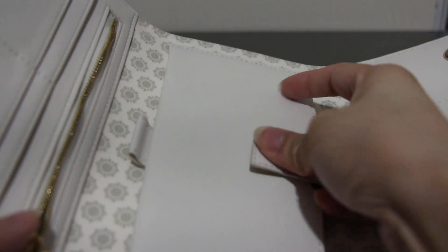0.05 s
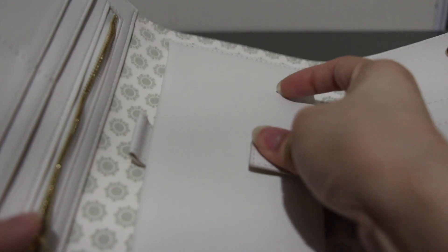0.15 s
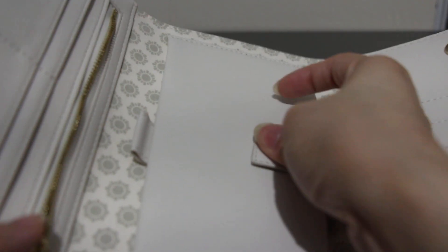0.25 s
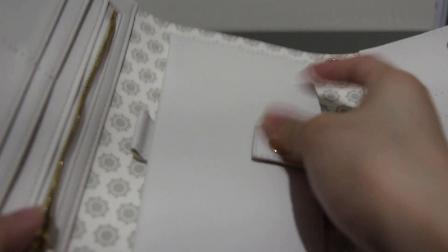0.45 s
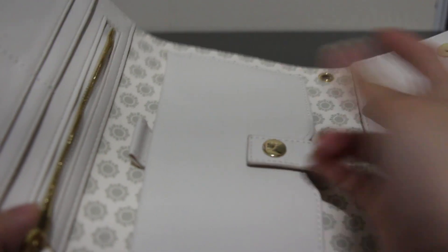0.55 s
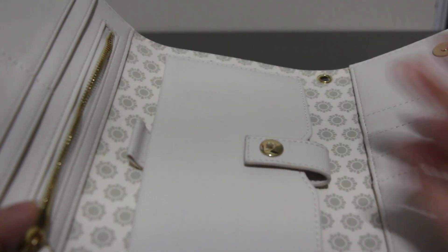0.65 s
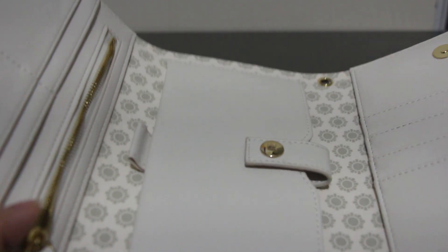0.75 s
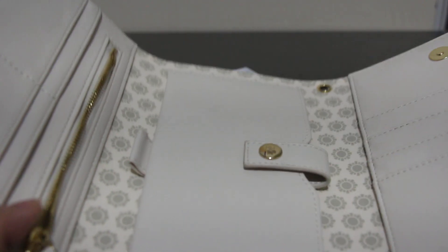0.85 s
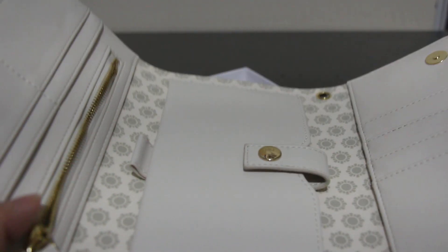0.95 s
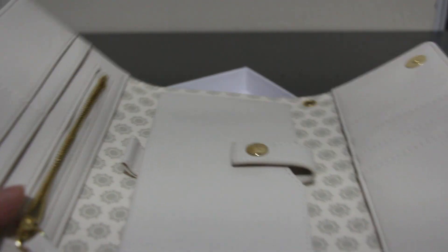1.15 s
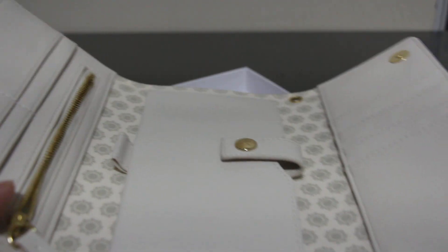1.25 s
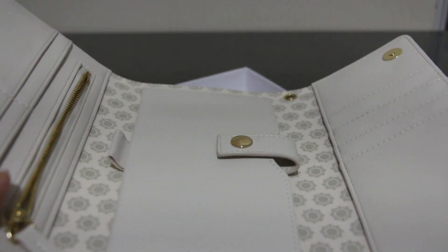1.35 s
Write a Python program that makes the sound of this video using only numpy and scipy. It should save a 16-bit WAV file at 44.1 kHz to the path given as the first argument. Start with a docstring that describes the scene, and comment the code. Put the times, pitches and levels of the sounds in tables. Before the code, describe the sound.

A wallet's snap button pops open with one loud, sharp click at about 0.2 seconds, after a light finger tap on the leather. The click echoes briefly in a small room. Fingers tap and rub softly, slipping off the strap with a tiny squeak near 0.5 seconds. The flap bumps gently around 0.9 and 1 second, then rustles faintly until about 1.3, all close by over faint hiss and hum.

```python
"""A light finger tap on leather, then a wallet's snap button pops open, close by in a small, quiet room.
The stud ticks against its spring and jumps free: the impulse excites damped modes of metal and wallet,
one loud click that overloads the recorder and reverberates. A fingertip leaves the strap with a short
stick-slip squeak; the flap rustles by friction and bumps softly over steady air noise and a faint hum."""
import sys
import numpy as np
from scipy import signal
from scipy.fft import rfft, irfft, next_fast_len
from scipy.io import wavfile
from scipy.ndimage import map_coordinates

SR = 44100
rng = np.random.default_rng(int(sys.argv[2]) if len(sys.argv) > 2 else 0)


def wav_record(signal):
    """Record a signal, one row per channel, as 16-bit PCM in the file named by sys.argv[1]."""
    frames = np.transpose(np.atleast_2d(signal))
    bounded = np.clip(frames, -1, 1)
    # unit amplitude maps onto the largest positive 16-bit level
    quanta = np.round(bounded * 32767).astype(np.int16)
    wavfile.write(sys.argv[1], SR, quanta)


N = 61739

# modes of the strap and wallet under the button (frequency [Hz], level [dB], t60 [s])
WALLET_MODES = [(400, 19, .0019), (725, 11.5, .0039), (1050, -3, .0085), (1320, 23, .0032)]
# modes of the metal stud and socket (frequency [Hz], level [dB], t60 [s])
METAL_MODES = [(2630, -25, 0.012), (3460, -31.5, 0.0051), (5010, -17, 0.0052), (5480, -24.5, 0.0066),
               (7690, -25, 0.003), (9440, -23, 0.0052), (11150, -28, 0.0057), (16400, -30, 0.0056)]
# spectrum of the stud's crack (frequency [Hz], gain [dB])
CRACK_SPECTRUM = [(300, -18), (3000, 4.5), (6500, 3.5), (10000, -1), (12500, -9.5)]
# its left-right likeness (frequency [Hz], coherence [0-1])
CRACK_COHERENCE = [(1000, 0.67), (8000, 0.43)]
# the stud catching on the spring before it gives (time [s], leather level [dB], metal level [dB])
CATCHES = [(0.207, -24, -14.5), (.2146, -42.5, -28)]
# the spring's short scrape at each catch (frequency [Hz], level [dB], t60 [s])
SPRING_MODES = [(2360, 2, 0.0087), (3150, 0.5, 0.0053)]
# fingers tapping the leather (time [s], level [dB])
FINGER_TAPS = [(0.0214, -20.5), (0.068, -40), (.3345, -25.5), (.409, -36), (0.5761, -35.5)]
# modes of the tapped leather (frequency [Hz], level [dB], t60 [s])
LEATHER_MODES = [(505, -9.5, 0.028), (823, 1.5, 0.0094), (1090, 4, 0.012), (1757, -9, 0.025),
                 (2173, -13, 0.026)]
# the opened wallet bumping softly (time [s], level [dB])
WALLET_BUMPS = [(.892, -37), (0.8997, -38.5), (1.001, -42.5), (1.0099, -37)]
# modes of its dull thud (frequency [Hz], level [dB], t60 [s])
THUD_MODES = [(175, -3, 0.17), (257.4, 3, 0.042)]
# the fingertip sticking and slipping off the strap (time [s], pitch [Hz], level [dB])
SQUEAK_PATH = [(.515, 560, -62), (.525, 610, -45), (.532, 680, -33), (.541, 790, -27), (.548, 810, -36),
               (.556, 790, -60)]
# fingers and flap rubbing
# (peak time [s], rise [s], fall [s], level [dB], tilt [dB/octave], resonance [Hz], boost [dB])
RUB_STROKES = [(.138, 0.036, .025, -55, 3.5, 4500, 3), (0.228, 0.011, .004, -43, 2.5, 1490, 0),
               (.39, 0.031, 0.032, -42.5, -0.5, 2020, 10), (0.496, 0.029, 0.074, -44.5, 2.5, 2200, -1),
               (0.534, 0.024, 0.021, -38.5, 1, 1380, -0.5), (0.649, 0.033, 0.027, -49, -5, 2000, 8.5),
               (.8, 0.029, 0.029, -59.5, -3, 2030, 13), (1.14, 0.062, 0.053, -53.5, 1, 1960, 3),
               (1.28, 0.098, 0.075, -51, 4.5, 2180, 10)]
# friction spectrum before tilt and resonance (frequency [Hz], relative level [dB])
RUB_SPECTRUM = [(100, -38), (500, -1), (1100, 2.5), (2200, -4.5), (3200, -9.5), (5000, -16), (9000, -28.5),
                (16000, -41)]
# reflections from nearby surfaces (delay [s], gain [dB])
REFLECTIONS = [(.008, -19), (.0135, -31), (.0162, -27), (.0188, -26), (.0212, -25)]
# the room's reverberation time (frequency [Hz], t60 [s])
TAIL_DECAY = [(300, 0.27), (800, 0.58), (1200, 0.35), (2000, 0.27), (5500, 0.3), (14600, 0.29)]
# spectrum of the reverberant tail (frequency [Hz], gain [dB])
TAIL_SPECTRUM = [(100, -34), (500, -10.5), (850, -18), (1200, -9), (1700, -11.5), (2300, -9), (2800, 0),
                 (3600, 0.5), (5000, -6), (6800, -8), (9500, -7.5), (11500, -8), (15500, -10.5)]
# left-right likeness of the tail and the rubbing (frequency [Hz], coherence [0-1])
ROOM_COHERENCE = [(200, 1), (1400, 0.92), (2800, 0.75), (10000, 0.22)]
# spectrum of the steady air noise (frequency [Hz], relative level [dB])
AIR_SPECTRUM = [(15, -37), (25, -16), (133, -3.5), (205, -8), (276, -3.5), (473, -9.5), (791, -10),
                (1510, -15.5), (2150, -16), (2460, -19.5), (5370, -24.5), (12700, -33.5), (15800, -39)]
# its left-right likeness (frequency [Hz], coherence [0-1])
AIR_COHERENCE = [(60, 0.83), (300, 0.53), (1500, 0.27), (5000, 0.13), (14000, 0.067)]
# partials of the faint hum (frequency [Hz], rms level [dB])
HUM_PARTIALS = [(62.5, -61), (111, -67), (136, -66), (271, -62.5)]

TIME = np.arange(N) / SR


def snap_button(snap_s=0.2296, snap_db=7, metal_lag_s=.0004):
    """Elastic release: the stud ticks against its spring, then jumps free and jolts the wallet."""
    ticks = np.zeros((2, N))
    for s, leather_db, metal_db in CATCHES:
        scrape = ring(s, list(LEATHER_MODES) + list(SPRING_MODES), attack_s=.00033)
        ticks += amp(leather_db) * scrape + amp(metal_db) * stud(s)
    jolt = ring(snap_s, WALLET_MODES, attack_s=.00095)
    return ticks - amp(snap_db) * (jolt + stud(snap_s + metal_lag_s))


def stud(s, crack_gain_db=-16.5, crack_t60_s=0.0046):
    """Hard impact: brief contact of metal on metal excites high modes and a broadband crack."""
    t = since(s)
    burst = amp(crack_gain_db) * (t > 0) * decay(t, crack_t60_s) * rng.standard_normal((2, N))
    return ring(s, METAL_MODES, attack_s=1 / SR) + stereo(burst, CRACK_SPECTRUM, CRACK_COHERENCE)


def knocks():
    """Soft impact: finger taps excite the leather's modes, bumps the low modes of the whole wallet."""
    taps = sum(amp(db) * ring(s, LEATHER_MODES, attack_s=.00033) for s, db in FINGER_TAPS)
    bumps = sum(amp(db) * ring(s, THUD_MODES, attack_s=.0006) for s, db in WALLET_BUMPS)
    return taps + bumps


def squeak(jitter=0.032, overtone_db=-16):
    """Stick-slip oscillation: skin catches and releases on leather in a short, unsteady rising tone."""
    s, hz, db = np.transpose(SQUEAK_PATH)
    pitch_hz = np.interp(TIME, s, hz) * (1 + jitter * wobble(400))
    phase = 2 * np.pi * np.cumsum(pitch_hz) / SR
    envelope = amp(np.interp(TIME, s, db)) * (TIME > s[0]) * (TIME < s[-1])
    return envelope * (np.sin(phase) + amp(overtone_db) * np.sin(2 * phase))


def rubbing(slips_per_s=1500, hiss_ratio=1.13, width_octaves=0.53):
    """Sliding friction: tiny random slips and a smooth hiss swell and fade through a broad resonance."""
    strokes = np.zeros((2, N))
    for s, rise, fall, db, tilt_db, peak_hz, boost_db in RUB_STROKES:
        slips = unit(rng.standard_normal((2, N)) * (rng.random(N) < slips_per_s / SR))
        hiss = hiss_ratio * rng.standard_normal((2, N))
        spectrum = [(hz, level + tilt_db * np.log2(hz / 1000)) for hz, level in RUB_SPECTRUM]
        friction = stereo(slips + hiss, spectrum, ROOM_COHERENCE)
        resonance = lambda hz: amp(boost_db * np.exp(-(np.log2((hz + 1) / peak_hz) / width_octaves) ** 2))
        swell = np.exp(-((TIME - s) / np.where(TIME < s, rise, fall)) ** 2)
        strokes += amp(db) * unit(filtered(friction, resonance)) * swell
    return strokes


def reverberation(x, skew_s=.00006, low_cut_hz=900, build_s=0.0013):
    """Reflection: a few early echoes, then a diffuse tail that lingers longest near 800 Hz."""
    skews = skew_s * rng.standard_normal((len(REFLECTIONS), 1, 1)) * [[1], [-1]]  # left against right
    echoes = lambda hz: sum(amp(db) * np.exp(-2j * np.pi * hz * (s + skew))
                            for (s, db), skew in zip(REFLECTIONS, skews))
    early = filtered(filtered(x, echoes), lambda hz: 1j * hz / (low_cut_hz + 1j * hz))
    hz, t, bands = signal.stft(rng.standard_normal((2, N)), SR, nperseg=256)
    bands *= decay(t, along(TAIL_DECAY, hz)[:, None])
    tail = signal.istft(bands, SR, nperseg=256)[1][:, :N]
    tail = stereo(tail / np.linalg.norm(tail[0]), TAIL_SPECTRUM, ROOM_COHERENCE)
    tail *= 1 - np.exp(-TIME / build_s)
    return early + signal.fftconvolve(x, tail, axes=1)[:, :N]


def room_noise(air_db=-50.5, waver_rad=0.49):
    """Noise floor: steady broadband air and a hum whose partials waver by random phase modulation."""
    air = amp(air_db) * unit(stereo(rng.standard_normal((2, N)), AIR_SPECTRUM, AIR_COHERENCE))
    hum = np.zeros(N)
    for hz, db in HUM_PARTIALS:
        phase = 2 * np.pi * (hz * TIME + rng.random()) + waver_rad * wobble(7.53)
        hum += np.sqrt(2) * amp(db) * np.sin(phase)
    return air + hum


def ring(s, modes, attack_s):
    """Modal superposition: damped sinusoids set ringing together at time s."""
    t = since(s)
    onset = (1 - np.exp(-t / attack_s)) ** 2
    return onset * sum(amp(db) * np.sin(2 * np.pi * hz * t) * decay(t, t60) for hz, db, t60 in modes)


def stereo(pair, spectrum, coherence):
    """Partial coherence: two independent signals, coloured and mixed as mid and side."""
    angle = lambda hz: np.arccos(np.clip(along(coherence, hz), 0, .999)) / 2
    gains = lambda hz: amp(along(spectrum, hz)) * [np.cos(angle(hz)), np.sin(angle(hz))]
    mid, side = filtered(pair, gains)
    return np.array([mid + side, mid - side])


def filtered(x, response):
    """Linear filtering: the spectrum of x times a frequency response."""
    size = next_fast_len(2 * N)
    return irfft(rfft(x, size) * response(np.fft.rfftfreq(size, 1 / SR)), size)[..., :N]


def decay(t, t60):
    """Exponential damping: 60 dB down after t60 seconds."""
    return np.exp(-np.log(1000) * t / t60)


def wobble(rate):
    """Random modulation: a smooth curve with rate knots a second."""
    knots = rng.standard_normal(int(N * rate / SR) + 4)
    return map_coordinates(knots, [TIME * rate])


def along(points, hz):
    """Interpolation of (frequency, value) points on a log-frequency axis."""
    frequencies, values = np.transpose(points)
    return np.interp(np.log(hz + 1), np.log(frequencies + 1), values)


def since(s):
    """Time elapsed since s, zero before it."""
    return np.maximum(TIME - s, 0)


def amp(db):
    """Decibels to amplitude ratio."""
    return 10 ** (np.asarray(db) / 20)


def unit(x):
    """Normalisation to rms 1."""
    return x / np.sqrt(np.mean(x ** 2) + 1e-20)


def scene():
    """Superposition: the wallet close by and slightly to the right, its reflections and the noise floor."""
    wallet = snap_button() + knocks() + squeak()
    balance = amp([[-.3], [.3]])
    return (wallet + reverberation(wallet) + rubbing()) * balance + room_noise()


def record(dry):
    """Overload and band limiting: the recorder clips the click, then cuts off the highest treble."""
    clipped, cutoff_hz = np.clip(dry, -1, 1), 16050
    return filtered(clipped, lambda hz: 1 / (1 + (hz / cutoff_hz) ** 200))


dry = scene()
out = record(dry)
wav_record(out)
```